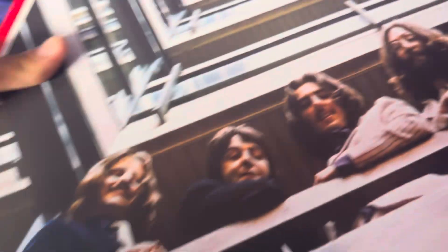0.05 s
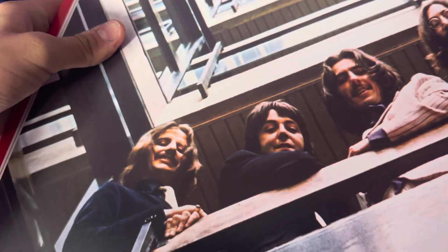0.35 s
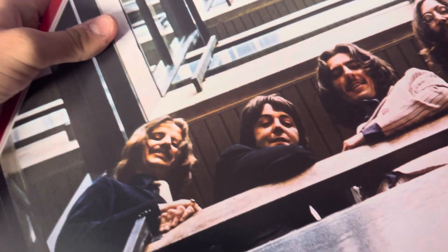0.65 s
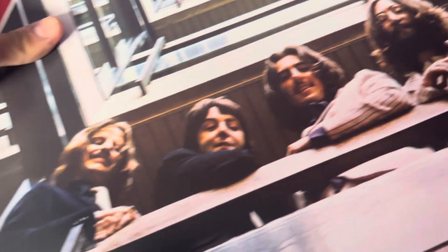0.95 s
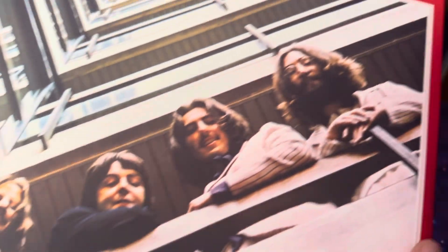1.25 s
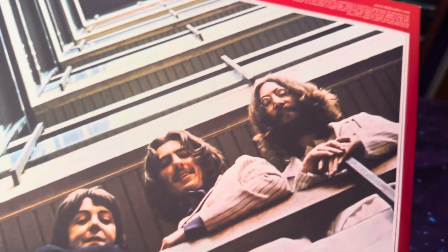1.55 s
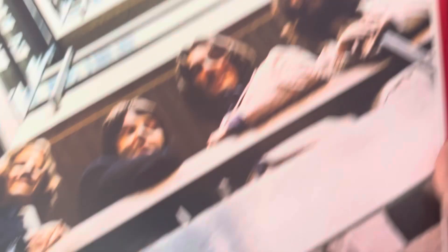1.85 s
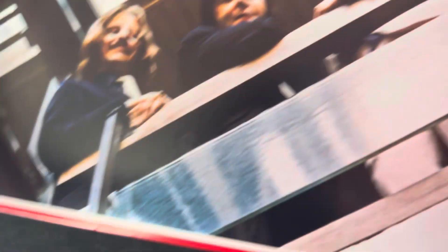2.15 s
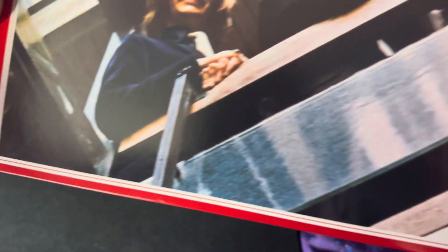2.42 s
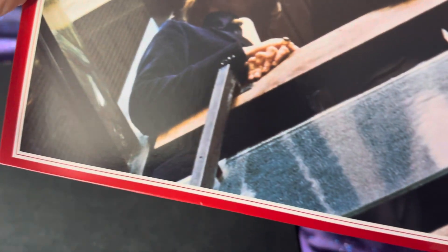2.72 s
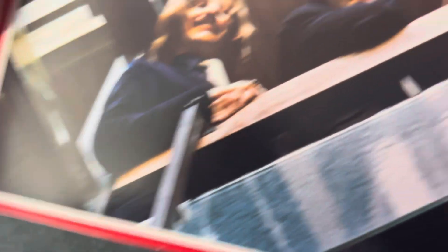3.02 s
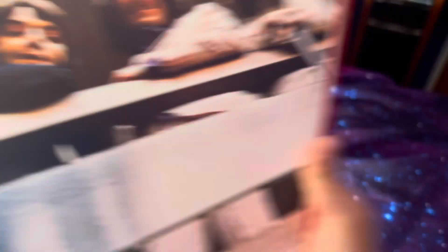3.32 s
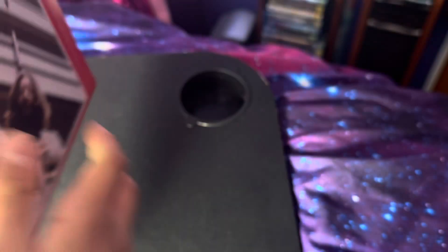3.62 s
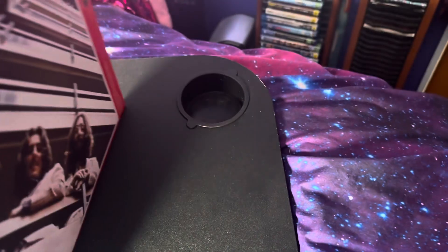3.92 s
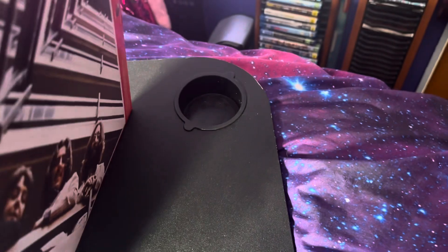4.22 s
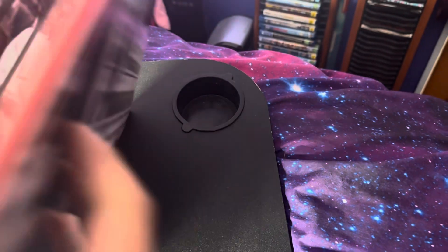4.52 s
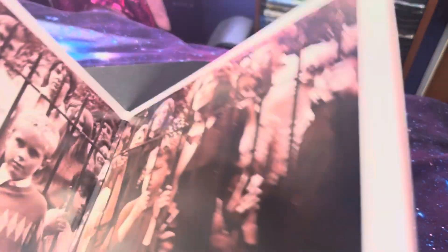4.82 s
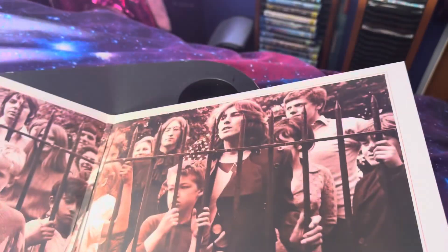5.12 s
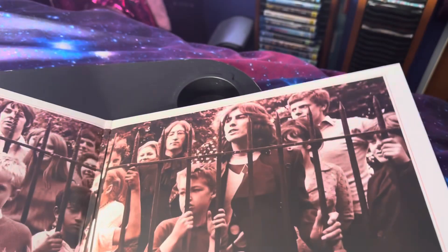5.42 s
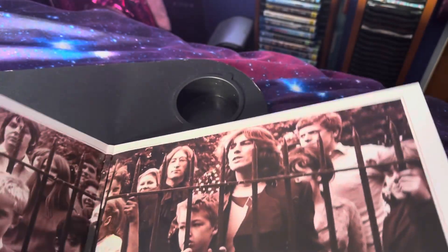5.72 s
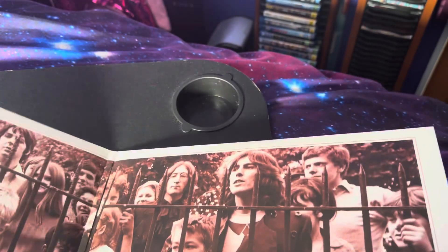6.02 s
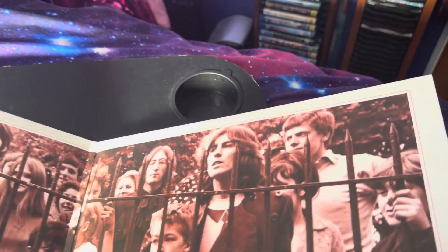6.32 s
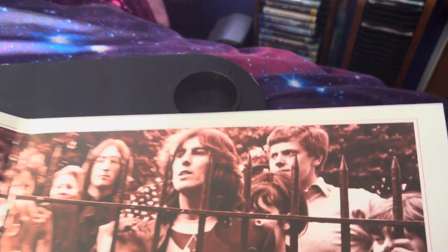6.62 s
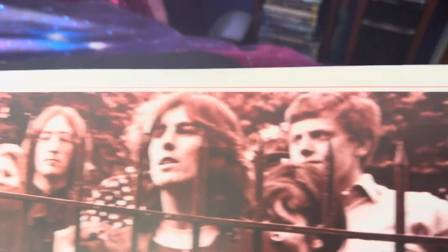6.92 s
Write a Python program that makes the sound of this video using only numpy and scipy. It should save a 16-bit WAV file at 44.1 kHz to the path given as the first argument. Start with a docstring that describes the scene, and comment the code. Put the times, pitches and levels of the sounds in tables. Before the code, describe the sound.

Hands handle a folding cardboard record sleeve near the microphone. A dull tap comes first, then a few faint ticks and a short hollow creak. Light scrapes and edge clicks lead to a soft thump as the sleeve is set down. Opening it brings a sharper burst of rustling and clicking, followed by smaller rubs and brief squeaks of the glossy card. The room is quiet, with only a low rumble and faint hiss.

```python
"""Handling a cardboard record sleeve

The sleeve is turned over, set down on a tray and opened, close up in a quiet room. Each knock runs
through the board as a bending wave, treble first and bass last: a quick downward chirp. The spine
creaks, fingers scrape and rub the card, edges click and the gloss squeaks. Underneath, the big panels
wobble and push air over a steady background of low rumble and faint hiss."""
import sys
import numpy as np
from scipy import signal
from scipy.fft import rfft, irfft
from scipy.io import wavfile
from scipy.ndimage import uniform_filter1d

SR = 44100
rng = np.random.default_rng(int(sys.argv[2]) if len(sys.argv) > 2 else 0)


def wav_record(signal):
    """Record a signal, one row per channel, as 16-bit PCM in the file named by sys.argv[1]."""
    frames = np.transpose(np.atleast_2d(signal))
    bounded = np.clip(frames, -1, 1)
    # unit amplitude maps onto the largest positive 16-bit level
    quanta = np.round(bounded * 32767).astype(np.int16)
    wavfile.write(sys.argv[1], SR, quanta)


N = 315911
HZ = np.fft.rfftfreq(8192, 1 / SR) + 1  # frequency axis of the responses


# Tone of the struck board: freq_hz, gain_db
BOARD_TONE = [(30, 3), (70, 10), (120, 3), (210, -1.5), (300, -12), (420, -12), (600, -21), (1100, -25.5),
              (1500, -37), (3000, -53.5), (8000, -63)]
# Knocks on the board: start_s, peak_db, low_cut_hz, travel_cycles
KNOCK_HITS = [(-.0008, -18, 408, .6), (.002, -36, 85.7, .5), (.997, -62.5, 120, .9),
              (3.1188, -47.5, 70, 1.1), (3.284, -47, 700, 2.5), (3.4685, -40.5, 97, 1),
              (3.8056, -26, 59.4, 1.27), (3.8729, -21.5, 100, 0.87), (3.883, -35, 790, 0.83),
              (4.013, -48, 60, .8), (5.054, -34, 396, 0.67), (5.074, -35.5, 420, 0.75), (5.14, -48, 40, .9),
              (5.165, -49, 35, 1), (5.507, -44, 99, 0.707), (5.595, -39, 76.5, .8), (5.855, -49.5, 40, .85),
              (6.127, -49, 60, .8), (6.304, -51.5, 35, .8), (6.499, -49.5, 201, .7),
              (6.514, -48, 239, 0.65)]
def knocks(echo_path=3.1, echo_hz=450):
    """Each blow sends out a bending wave; a duller copy returns from the edge of the board."""
    out = np.zeros((2, N))
    for start_s, peak_db, low_cut_hz, cycles in KNOCK_HITS:
        blow = causal(amp(curve(BOARD_TONE, HZ)) / np.sqrt(1 + (low_cut_hz / HZ) ** 6))
        echo = .4 * bending(echo_path * cycles) / (1 + 1j * HZ / echo_hz)
        knock = place(blow * (bending(cycles) + echo), pan_db=3.5, lead_ms=0.11)  # board sits left
        add(out, start_s, amp(peak_db) * knock / abs(knock.mean(0)).max())
    return out


def bending(cycles):
    """Dispersion in the board: every frequency is late by the same number of its own cycles."""
    return np.exp(-2j * np.pi * cycles * np.log((HZ + 10) / HZ[-1]))


# Tone of the hollow spine: freq_hz, gain_db
SPINE_TONE = [(70, -18), (170, -4.5), (290, 1.5), (390, -5.5), (500, -0.5), (650, -10), (850, -7.5),
              (1250, -20), (2100, -25), (2700, -34.5), (5000, -39)]
# Creaks, two quick slips each: start_s, first_peak_db, second_vs_first_db
SPINE_CREAKS = [(2.3031, -44.5, -18), (2.3431, -38, 2.5), (2.3900, -39, 3), (2.4231, -41.5, 0.5),
                (2.5149, -49, -9), (2.545, -53.5, -12)]
def creaks(gap_s=.0047, travel_cycles=0.662, firm_slip_db=-38, firm_tick_db=-44, grit_s=0.00075):
    """Each slip of the spine sends a hollow bending wave through the board, with a tick of gloss."""
    out, t = np.zeros((2, N)), np.arange(SR // 100) / SR
    hollow = causal(amp(curve(SPINE_TONE, HZ)))
    for start_s, first_db, second_vs_first_db in SPINE_CREAKS:
        for late_s, slip_db in ((0, first_db), (gap_s, first_db + second_vs_first_db)):
            cycles = travel_cycles * (1 + .15 * rng.uniform(-0.94, 1))
            wave = place(hollow * bending(cycles), pan_db=-4.5)
            wave /= abs(wave.mean(0)).max()
            gloss = contact(body_db=0, fizz_db=11, ring_hz=2050, pan_db=0, lead_ms=-0.13, sheen_db=1)
            grit = rng.choice([-1., 1.], len(t)) * np.exp(-t / grit_s)
            tick = signal.lfilter(grit / np.linalg.norm(grit), 1, gloss)
            tick_db = firm_tick_db + .65 * (slip_db - firm_slip_db)  # light slips keep more tick
            add(out, start_s + late_s, amp(slip_db) * wave + amp(tick_db) * tick)
    return out


# Card sliding on card or skin: start_s, hold_s, level_db (before trim), fizz_db, ring_hz, left_lead_ms
SCRAPE_STROKES = [(.015, 0.082, -57, 4.5, 3800, -0.069), (.13, 0.065, -54, -1, 1390, 0),
                  (1.627, 0.061, -67.5, -4.5, 2090, .32), (1.776, 0.031, -67.5, -6, 2100, .3),
                  (3.095, 0.029, -51, 0, 1890, -.09), (3.346, 0.018, -53, -6, 1880, 0),
                  (3.4, 0.063, -48.5, -5.5, 1580, .43), (3.463, 0.0026, -38, -11, 1650, .43),
                  (3.515, 0.026, -45, -21, 3300, .36), (3.665, 0.017, -55.5, -11.5, 960, .32),
                  (3.705, 0.0072, -53.5, -9, 1160, .36), (3.906, 0.11, -67, -10, 396, 0),
                  (4.049, 0.057, -48.5, 3.5, 3420, -.09), (4.273, 0.05, -64.5, 7.5, 3500, -.09),
                  (4.378, 0.049, -62, 0, 2940, -.1), (4.976, 0.015, -41, -7, 2070, -.09),
                  (5.002, 0.0045, -36.5, -9.5, 1850, 0), (5.027, 0.034, -42.5, -2, 880, .41),
                  (5.046, 0.028, -35, -4.5, 960, .16), (5.071, 0.0054, -30, -30, 2250, .16),
                  (5.089, 0.05, -47, -11, 1930, .16), (5.189, 0.011, -45, -9.5, 2070, -.09),
                  (5.275, 0.022, -49, -11.5, 1700, 0), (5.378, 0.013, -51.5, -14, 2230, 0),
                  (5.51, 0.082, -52.5, -5, 2700, -.09), (5.628, .02, -47.5, -5, 1300, .34),
                  (5.661, 0.019, -56, -1.5, 2500, 0), (5.867, 0.064, -61, -5.5, 3030, 0),
                  (6, 0.021, -64, 7.5, 2270, -.09), (6.189, 0.044, -84.5, 20.5, 4770, 0),
                  (6.509, 0.047, -57, -6.5, 2680, -.18), (6.573, .068, -63, 5.5, 3870, -.09),
                  (6.683, 0.11, -71.5, -2, 3000, -0.052), (6.924, 0.058, -85.5, 13, 3430, -.09)]
def scrapes(trim_db=-5, min_attack_s=.004, min_release_s=0.0088):
    """Short slides: a rush of slips swells, holds and lets go. A fizzier stroke has an airier top."""
    out, t = np.zeros((2, N)), np.arange(SR // 5) / SR
    for start_s, hold_s, level_db, fizz_db, ring_hz, lead_ms in SCRAPE_STROKES:
        attack = np.minimum(t / (min_attack_s + 0.2 * hold_s), 1)
        release = np.exp(-np.maximum(t - hold_s, 0) / (min_release_s + 0.26 * hold_s))
        shared, left, right = (slips(len(t), per_s=2500, spread_db=2.5, hiss=0.45) for _ in range(3))
        friction = unit_rms(shared + .45 * np.array([left, right])) * attack * release
        spot = contact(panel_body_db(ring_hz) + 1, fizz_db, ring_hz,
                       pan_db=2.5, lead_ms=lead_ms, sheen_db=3 + 0.16 * fizz_db)
        scrape = signal.fftconvolve(friction, spot, axes=1)
        add(out, start_s - min_attack_s / 2, amp(level_db + trim_db) * scrape)
    return out


# Edges and nails catching: snap_s, level_db, fizz_db, ring_hz, left_lead_ms
EDGE_CLICKS = [(1.306, -68.5, -1, 2960, 0), (1.4029, -61, -24, 1700, 0.19), (1.633, -61.5, 1.5, 3080, 0.31),
               (1.7022, -57, 2.5, 3590, -.09), (3.068, -51, -6, 2720, .27), (3.1073, -47, 4, 2500, -0.041),
               (3.1183, -39, 2.5, 2760, 0), (3.2646, -53.5, 0, 2030, -0.16),
               (3.2825, -42.5, -4, 3920, 0.29), (3.3533, -47, -16, 2080, 0), (3.4686, -41, 7, 1780, -.45),
               (3.8076, -54.5, 2, 1020, 0), (3.8624, -43, -11, 3600, 0.2), (3.8741, -39.5, -1.5, 3660, 0),
               (4.0132, -44, 0, 2355, 0), (4.243, -68.5, 12.5, 2050, -0.084),
               (4.256, -62.5, 6, 4750, -0.11), (4.279, -61, 10, 3500, -0.055),
               (4.3007, -50.5, 0, 4940, 0.14), (4.3891, -52.5, 7, 2290, 0), (4.3988, -47.5, -1, 2840, .32),
               (4.4202, -48, -14, 3140, 0.31), (4.5316, -67.5, 4.5, 4480, 0), (5.0555, -30, -2, 2840, 0.22),
               (5.0772, -28.5, -4, 2330, 0), (5.12, -38.5, -15, 2020, .34), (5.3818, -47, -22, 2160, 0),
               (5.69, -52, -13, 1100, 0), (5.7595, -40.5, -17, 1990, -0.12), (5.7663, -49.5, -11, 1640, 0),
               (5.857, -50, -18, 2030, .29), (5.9999, -53, 2, 2300, -0.064), (6.1012, -42, -10, 2120, 0.26),
               (6.1253, -46.5, 1.5, 2120, 0.39), (6.2794, -48, -19, 2680, 0.32),
               (6.2874, -48.5, -28, 3090, 0.36), (6.5523, -52, 8, 2830, -0.063),
               (7.0462, -64.5, 6, 3630, -.07), (7.0777, -62, -1.5, 2030, -.09)]
def clicks(drag_db=-18, drag_s=.004, snap_decay_s=.0008, chatter_s=0.0017):
    """An edge drags, snaps free and chatters for a moment."""
    out, t = np.zeros((2, N)), np.arange(-SR // 100, SR // 30) / SR
    snap = (t >= 0) * np.exp(-abs(t) / snap_decay_s)
    drag = amp(drag_db) * np.exp(-abs(t) / drag_s)
    drag_and_chatter = np.where(t < 0, drag, np.exp(-abs(t) / chatter_s))
    for snap_s, level_db, fizz_db, ring_hz, lead_ms in EDGE_CLICKS + judder():
        grit = rng.choice([-1., 1.], (3, len(t)))  # left, right, shared
        rattle = unit_rms(drag_and_chatter * (grit[:2] + grit[2]))
        spectrum = rfft(unit_rms(snap * grit[2]) + .7 * rattle)
        # a snap excites all frequencies nearly evenly
        drive = irfft(spectrum / np.sqrt(abs(spectrum) + 1e-9), len(t))
        drive *= np.sqrt(SR / 1000) / np.linalg.norm(drive[0])  # the energy of 1 ms at unit rms
        spot = contact(panel_body_db(ring_hz) - 3.5, fizz_db, ring_hz, pan_db=-1, lead_ms=lead_ms)
        add(out, snap_s + t[0], amp(level_db) * signal.fftconvolve(drive, spot, axes=1))
    return out


def judder(start_s=3.5357, gap_s=.0052, level_db=-40, fizz_db=-16, ring_hz=3480, lead_ms=0.324):
    """An edge judders along the card: rows for a quick run of five like clicks."""
    return [(start_s + k * gap_s, level_db, fizz_db, ring_hz, lead_ms) for k in range(5)]


# Squeaks of the fold and the gloss: start_s, fade_s, level_db, pitch_hz, left_lead_ms
GLOSS_SQUEAKS = [(3.283, 0.0022, -39, 3510, 0.29), (3.4679, 0.0068, -31.5, 1777, 0.59),
                 (5.003, 0.0049, -30.5, 1900, 0.07), (5.375, 0.0075, -40.5, 1990, 0.15),
                 (5.623, 0.011, -43.5, 1960, -0.11), (5.664, 0.0022, -34, 4800, .43),
                 (5.681, 0.011, -50.5, 2290, 0.031), (5.855, .0071, -44, 1990, 0.3),
                 (5.866, 0.016, -49, 3180, 0), (6.277, 0.0037, -58, 2740, .28),
                 (6.512, 0.0032, -38.5, 2310, 0.306)]
def squeaks(waver_hz=260, rise_s=0.0026):
    """Glossy card sticks and slips around one pitch for a moment: a short fuzzy tone."""
    out, t = np.zeros((2, N)), np.arange(SR // 12) / SR
    for start_s, fade_s, level_db, pitch_hz, lead_ms in GLOSS_SQUEAKS:
        waver = unit_rms(uniform_filter1d(rng.standard_normal(len(t)), size=60))
        tone = np.sin(2 * np.pi * np.cumsum(pitch_hz + waver_hz * waver) / SR)
        swell = np.minimum(t / rise_s, 1) * np.exp(-(t / fade_s) ** 2)
        position = place(1.0, pan_db=-3.5, lead_ms=lead_ms)
        add(out, start_s, amp(level_db) * signal.fftconvolve((tone * swell)[None], position, axes=1))
    return out


# Hands lifting the sleeve: time_s, effort_db
LIFT_MOVE = [(0, -53), (.1, -58.5), (.19, -53.5), (.25, -80), (.36, -100.5)]
# Hands turning it over: time_s, effort_db
TURN_MOVE = [(3.0, -100), (3.114, -71), (3.248, -75.5), (3.484, -65), (3.744, -90), (3.988, -63.5),
             (4.114, -79), (4.456, -78.5), (4.6, -90)]
# Hands opening it: time_s, effort_db
OPEN_MOVE = [(4.6, -81.5), (4.96, -66), (5.17, -61.5), (5.33, -64.5), (5.5, -62), (5.65, -69), (6.35, -73),
             (6.64, -76), (6.77, -88), (7.16, -84)]
USUAL_RUB_DB = -72.5
def hand_effort():
    """How hard the hands rub: 1 for an ordinary rub, 0 while they rest."""
    t = np.arange(N) / SR
    moves = map(np.transpose, (LIFT_MOVE, TURN_MOVE, OPEN_MOVE))
    return sum(np.interp(t, time_s, amp(effort_db - USUAL_RUB_DB), 0, 0) for time_s, effort_db in moves)


# Stereo image of the rubbing: freq_hz, left_right_correlation
RUB_IMAGE = [(100, 0.99), (400, 0.82), (1000, -0.72), (2000, -.1), (5000, 0.16), (12000, 0.34)]
def rubbing(body_db=-2.5, fizz_db=-6, waver_db=2):
    """Hands drift over the card with uneven pressure; the same slips feed body, rasp and fizz."""
    out, effort = np.zeros((2, N)), hand_effort()
    grains = np.array([slips(N, per_s=900, spread_db=0.5, hiss=1) for _ in range(2)])
    grains = wandering(grains + .4 * crackle(), depth_db=3.4)
    pressure = amp(waver_db * unit_rms(uniform_filter1d(rng.standard_normal(N), size=700)))
    body, rasp, fizz = card_bands()
    for band, trim_db, drive in ((body, body_db, effort ** 0.78), (rasp, 0, effort),
                                 (fizz, fizz_db, effort)):
        out += amp(USUAL_RUB_DB + trim_db) * drive * pressure * stereo_noise(grains, band, RUB_IMAGE)
    return out


def slips(size, per_s, spread_db, hiss):
    """Friction: many tiny slips of uneven size over a smooth hiss."""
    sizes = amp(spread_db * np.minimum(rng.exponential(1, size), 3.5)) * rng.choice([-1, 1], size)
    slipping = rng.random(size) < per_s / SR
    return unit_rms(unit_rms(sizes * slipping) + hiss * rng.standard_normal(size))


def crackle(per_s=45, cutoff_hz=3000):
    """Now and then a few fibres of the fold give way at once."""
    pops = np.array([slips(N, per_s, spread_db=4, hiss=0) for _ in range(2)])
    return unit_rms(signal.lfilter(*signal.butter(1, cutoff_hz, fs=SR), pops))


def wandering(x, depth_db):
    """The resonances of the card shift as the point of contact moves."""
    frames = signal.stft(x, nperseg=512)[2]
    patches = rng.standard_normal(frames.shape[1:])
    for axis, size in ((0, 3), (0, 4), (1, 6), (1, 9)):  # smooth over frequency, then time
        patches = uniform_filter1d(patches, size, axis)
    frames = frames * amp(depth_db * unit_rms(patches))
    return unit_rms(signal.istft(frames, nperseg=512)[1][:, :N])


# Tone of rubbed card: freq_hz, gain_db
CARD_TONE = [(100, 0.5), (280, 0.5), (450, 1), (650, -1.5), (950, 0), (1400, -2.5), (1900, -4),
             (3200, -6.5), (5000, -10), (7000, -15.5), (9400, -9.5), (11000, -20), (15500, -24)]
def card_bands(low_cut_hz=170, body_hz=1200, fizz_hz=5500):
    """Rubbed card in three equal-power parts: body of the panel, rasp of fibres, fizz of the gloss."""
    card = amp(curve(CARD_TONE, HZ)) / np.sqrt(1 + (low_cut_hz / HZ) ** 4)
    body = 1 / (1 + (HZ / body_hz) ** 6)
    fizz = 1 / (1 + (fizz_hz / HZ) ** 8)
    rasp = (1 - body) * (1 - fizz)
    return [unit_rms(card * np.sqrt(share)) for share in (body, rasp, fizz)]


def contact(body_db, fizz_db, ring_hz, pan_db, lead_ms, sheen_db=0, ring_db=8, ring_q=6):
    """The response of one spot of the sleeve: one strong resonance among many chance ones."""
    body, rasp, fizz = card_bands()
    ring = amp(ring_db / (1 + (ring_q * np.log(HZ / ring_hz)) ** 2))
    sheen = amp(sheen_db / (1 + (10500 / HZ) ** 10))  # high shelf
    glossy_fizz = amp(fizz_db) * unit_rms(fizz * sheen)
    tone = np.sqrt((amp(body_db) * body) ** 2 + unit_rms(rasp * ring) ** 2 + glossy_fizz ** 2)
    ripple = unit_rms(uniform_filter1d(uniform_filter1d(rng.standard_normal(len(HZ)), 30), 20))
    chance_modes = unit_rms(amp(3.5 * np.tanh(ripple)))
    return place(causal(tone * chance_modes) * bending(cycles=1.1), pan_db, lead_ms)


def panel_body_db(ring_hz, db_per_octave=6.5, middle_hz=1905):
    """The lower a spot rings, the more of the panel moves with it."""
    return db_per_octave * np.log2(middle_hz / ring_hz)


# Tone of the flexing panels: freq_hz, gain_db
PANEL_TONE = [(20, -19.5), (45, 1), (65, -2), (120, -6.5), (200, -11), (400, -23), (1000, -56)]
# Stereo image of the flexing and the background: freq_hz, left_right_correlation
BED_IMAGE = [(60, 0.85), (300, 0.66), (800, 0), (2000, 0), (10000, 0.5)]
def flexing(held_db=-70.5, moved_db=-63.5):
    """The big panels wobble and push air, more so when the hands move them."""
    level = np.hypot(amp(held_db), amp(moved_db) * hand_effort() ** .4)
    return level * stereo_noise(rng.standard_normal((2, N)), amp(curve(PANEL_TONE, HZ)), BED_IMAGE)


# Colour of the background noise: freq_hz, gain_db
BACKGROUND_TONE = [(20, -19), (36, -7.5), (62, -3), (115, -16), (160, -24), (340, -24.5), (470, -31.5),
                   (750, -33.5), (2200, -34.5), (2900, -40), (5200, -43.5), (6400, -38), (7600, -48),
                   (8500, -40.5), (10800, -55.5), (14200, -52), (16000, -57)]
def background(level_db=-67.5):
    """A steady low rumble and a faint, unevenly coloured hiss."""
    tone = amp(curve(BACKGROUND_TONE, HZ))
    return amp(level_db) * stereo_noise(rng.standard_normal((2, N)), tone, BED_IMAGE)


# Decay of the room: freq_hz, t60_s
ROOM_DECAY = [(100, 0.32), (500, 0.18), (2000, 0.22), (8000, 0.12), (16000, 0.04)]
def room(x, near_db=-12, near_s=0.0055, tail_db=-15, bass_hz=350):
    """Quick reflections from the tray and the facing panel, then a short furnished-room tail."""
    age = np.arange(SR // 2) / SR
    echoes = rng.choice([-1., 1.], (2, len(age))) * (rng.random((2, len(age))) < 3000 / SR)
    near = echoes * (age > .001) * np.exp(-age / near_s)
    near = signal.lfilter(*signal.butter(1, 700, "high", fs=SR), near)
    hz, t, frames = signal.stft(echoes * (age > .007), SR, nperseg=256)
    frames += (frames[0] - frames) / (1 + (hz[:, None] / bass_hz) ** 4)  # bass reaches both sides alike
    decay = amp(-60 * t / curve(ROOM_DECAY, hz)[:, None])
    tail = signal.istft(frames * decay, SR, nperseg=256)[1][:, :len(age)]
    response = amp(near_db) * near / np.linalg.norm(near[0])
    response += amp(tail_db) * tail / np.linalg.norm(tail[0])
    return signal.fftconvolve(x, response, axes=1)[:, :N]


def amp(db):
    """Decibels to gain."""
    return 10 ** (np.asarray(db) / 20)


def unit_rms(x):
    """Scales to an rms of 1."""
    return x / np.sqrt(np.mean(abs(x) ** 2) + 1e-20)


def curve(points, hz):
    """Reads a table along a log-frequency axis."""
    freq_hz, value = np.transpose(points)
    return np.interp(np.log(hz + 1), np.log(freq_hz + 1), value)


def add(mix, start_s, sound):
    """Lays a stereo sound into the mix."""
    at = round(start_s * SR)
    sound = sound[:, max(-at, 0):]
    part = mix[:, max(at, 0):][:, :sound.shape[1]]
    part += sound[:, :part.shape[1]]


def causal(gain):
    """The minimum-phase response with this gain: it starts at once and rings afterwards."""
    log_gain = np.log(np.maximum(gain, 1e-6 * gain.max()))
    mirrored = np.concatenate([log_gain, log_gain[-2:0:-1]])
    return gain * np.exp(-1j * signal.hilbert(mirrored).imag[:len(gain)])


def place(response, pan_db, lead_ms=0):
    """Left and right impulse responses; positive values make the left louder and earlier."""
    delay_s = np.maximum([[-lead_ms], [lead_ms]], 0) / 1000
    return irfft(response * np.exp(-2j * np.pi * HZ * delay_s)) * amp([[pan_db / 2], [-pan_db / 2]])


def stereo_noise(noise, gain, image):
    """Colours two noises and makes them partly alike."""
    hz = np.fft.rfftfreq(N, 1 / SR)
    left, other = rfft(noise)
    likeness = np.clip(curve(image, hz), -1, 1)
    right = likeness * left + np.sqrt(1 - likeness ** 2) * other
    return unit_rms(irfft(np.array([left, right]) * np.interp(hz, HZ, gain), N))


def scene():
    """The sleeve in its room."""
    sleeve = knocks() + creaks() + scrapes() + clicks() + squeaks() + rubbing()
    return sleeve + room(sleeve) + flexing() + background()


def record(dry):
    """A steep high cut at 16 kHz."""
    high_cut = signal.firwin(511, 16000, window=("kaiser", 9), fs=SR)
    return signal.oaconvolve(dry, high_cut[None], "same")


dry = scene()
out = record(dry)
wav_record(out)
```